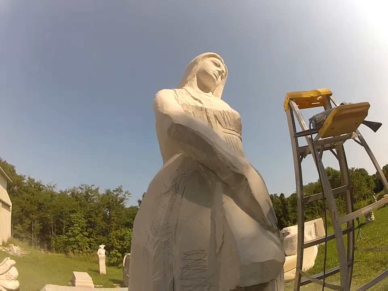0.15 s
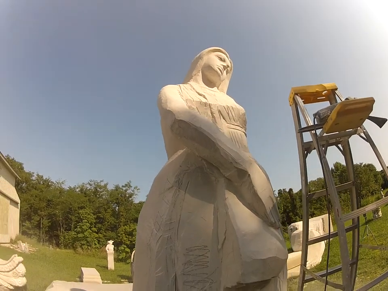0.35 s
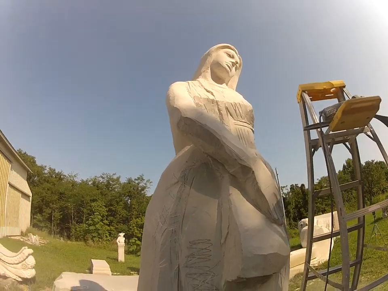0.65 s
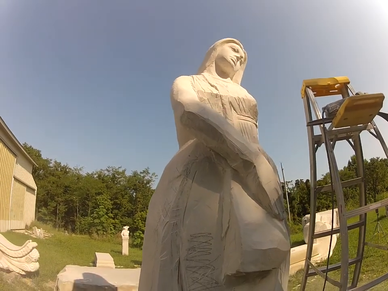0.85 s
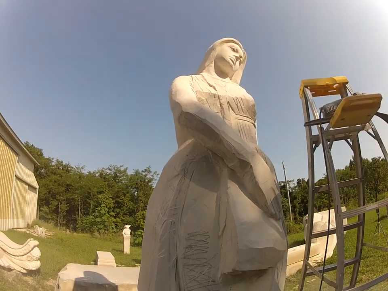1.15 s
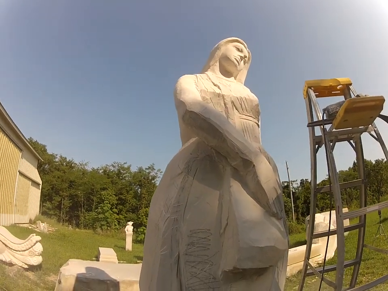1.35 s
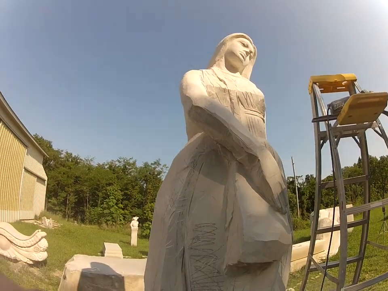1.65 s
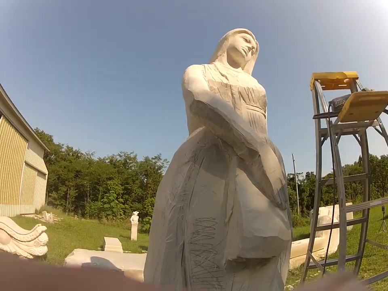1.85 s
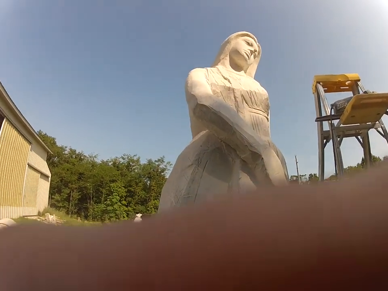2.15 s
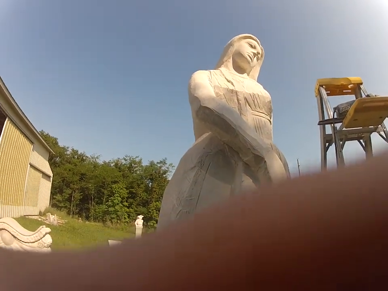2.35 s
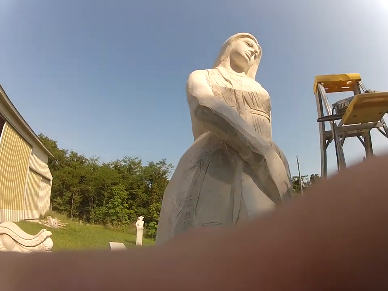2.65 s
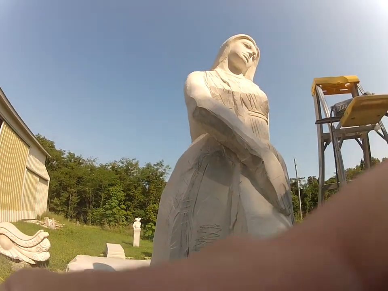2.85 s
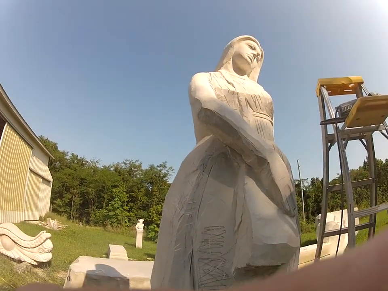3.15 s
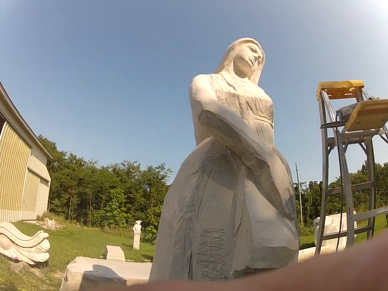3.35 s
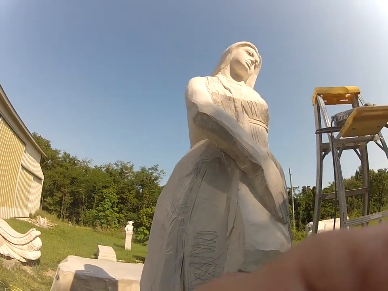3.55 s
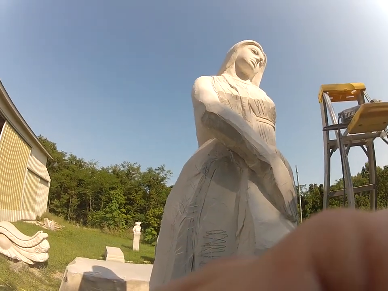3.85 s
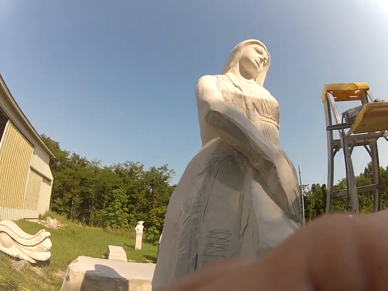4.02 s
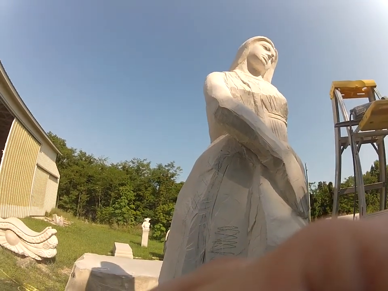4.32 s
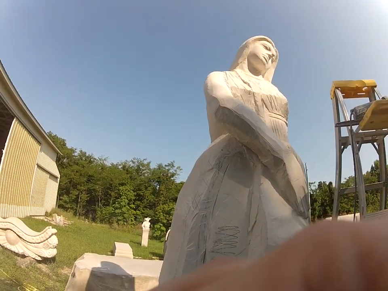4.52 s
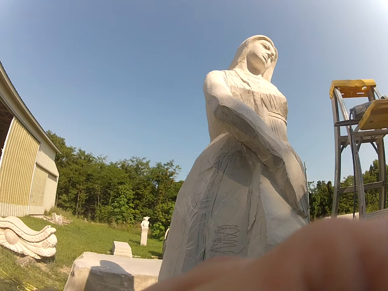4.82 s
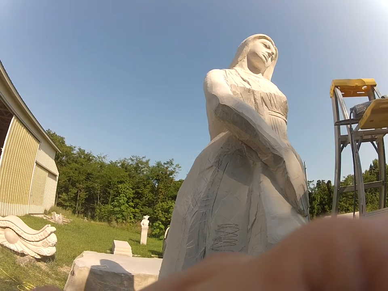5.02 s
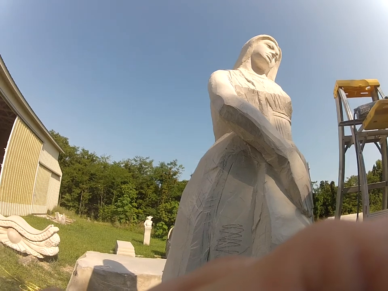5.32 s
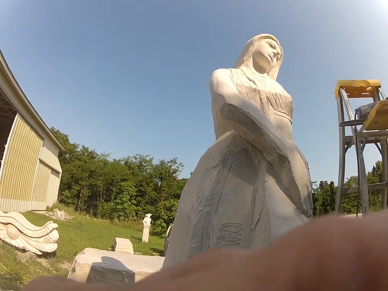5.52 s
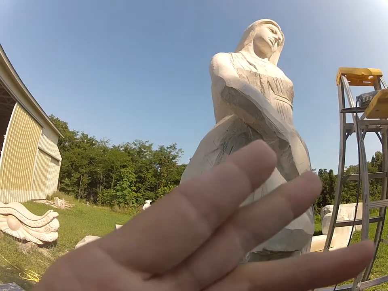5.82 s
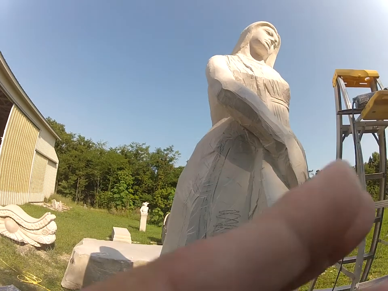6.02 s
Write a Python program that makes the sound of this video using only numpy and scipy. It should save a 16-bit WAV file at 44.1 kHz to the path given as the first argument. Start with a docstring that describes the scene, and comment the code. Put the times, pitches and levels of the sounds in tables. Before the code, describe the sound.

An angle grinder scours stone in a fast, rasping rattle over a low outdoor rumble, its motor whine falling in pitch twice. Much closer and louder, fingers rub and click on the microphone's plastic case and jolt its mount, and a fingertip pops against the opening midway and again near the end. The grinding gradually eases but keeps going, and everything has a thin, metallic edge in the treble.

```python
"""Outdoors, over low rumble, an angle grinder's disc bounces on stone; the motor slows, its whine sinks.
From 1 s a hand handles the camera: skin rubs the case, the case clicks, the mount thumps.
The whine stops at 2.6 s, returns high at 3 s and spins down again until 5.5 s.
At 3.6 s and 5.6 s a fingertip puffs air into the microphone port; the chatter runs on, softer.
Throughout, the camera holds its samples at a low rate, which mirrors every sound into the treble."""
import sys
import numpy as np
from scipy import signal
from scipy.fft import rfft, irfft, next_fast_len
from scipy.io import wavfile
from scipy.ndimage import map_coordinates

SR = 44100
rng = np.random.default_rng(int(sys.argv[2]) if len(sys.argv) > 2 else 0)


def wrap_up_sound(samples):
    """Save the sound to the file named by the first command line argument, as 16-bit audio."""
    columns = np.atleast_2d(samples).T
    # keep every value between -1 and 1, then stretch to whole-number steps
    tamed = np.clip(columns, -1, 1)
    steps = np.round(tamed * 32767).astype(np.int16)
    wavfile.write(sys.argv[1], SR, steps)


N = 272538
T = np.arange(N) / SR

# open-air rumble spectrum: freq_hz, relative_db
AIR_SPECTRUM = [(20, -29), (40, -4), (56, 1.5), (80, -12), (120, -20), (250, -22.5), (500, -31),
                (1000, -32.5), (5800, -49.5)]
# hand jolts the mount: time_s, level_db
MOUNT_JOLTS = [(1.045, -22.5), (1.078, -24), (1.755, -30.5), (1.879, -22), (2.34, -33), (2.58, -26.5),
               (2.927, -21), (3.032, -21), (3.468, -24.5), (3.599, -33), (4.16, -32.5), (5.564, -13),
               (5.623, -21.5)]
# fingertip on the microphone port: peak_s, level_db, rise_s, release_s
PORT_PUSHES = [(3.5828, -1, 0.00069, .002), (5.565, 1, 0.0013, 0.0013), (5.5792, -6.5, 0.00093, 0.0024),
               (5.6218, -14, 0.00057, 0.0024)]
# skin slides over the case: start_s, length_s, relative_db
RUB_STROKES = [(1.028, 0.067, -37.5), (1.196, 0.19, -36.5), (1.592, .077, -41), (1.735, 0.094, -43),
               (1.972, 0.14, -39.5), (2.102, 0.22, -47), (2.286, 0.25, -39.5), (2.517, .1, -30.5),
               (2.546, 0.042, -25), (2.625, 0.087, -40.5), (2.765, .042, -44), (2.868, 0.13, -39),
               (2.985, 0.17, -39), (3.141, 0.077, -38), (3.38, 0.13, -38.5), (3.706, 0.055, -42),
               (3.974, 0.069, -46), (5.528, 0.14, -42)]
# skin-on-plastic spectrum: freq_hz, relative_db
SKIN_SPECTRUM = [(60, 9.5), (200, 5), (400, -7), (750, -13), (1150, -1.5), (1500, -8.5), (1850, 1.5),
                 (2450, -0.5), (2800, -10), (3300, -1), (3700, 0), (4400, -14), (5200, -9), (5800, -14)]
# fingers click on the case: start_s, level_db, knock_relative_db, crack_relative_db, ring_t60_s
CASE_CLICKS = [(1.0335, -29.5, 2.5, -6, .02), (1.075, -26, -3, -1, 0.011), (1.3133, -11, -3, -14, 0.022),
               (1.322, -27, 5.5, -7, 0.018), (2.9407, -16.5, 11, -16, 0.021), (3.031, -26.5, 6, -18, 0.028),
               (3.2917, -21.5, 1, -19, .013), (3.4204, -32.5, 10, -8, .02), (3.5649, -33, -5, 9.5, 0.065),
               (3.582, -10.5, -8.5, 2.5, .016), (3.6087, -22.5, -27, -9, .02),
               (5.563, -16.5, -10, -4, 0.0095), (5.588, -27, -10, 5.5, 0.023), (5.5951, -18, 9, -9, 0.0086),
               (5.625, -23, -8, -31, 0.04)]
# plastic case modes: freq_hz, relative_db, t60_ratio
CASE_MODES = [(403, -1.5, 0.33), (662, -7, 0.45), (816, -8, 0.64), (1140, -4, 1.07), (1256, -13.5, 0.59),
              (1937, -8, 1.2), (2130, -11.5, 1.84), (2410, -3.5, 0.7), (3630, -9.5, 1), (4720, -28, 0.76)]
# the cut eases off: time_s, chatter_db, whirr_db, treble_tilt_db
CUT_LEVELS = [(0, -49, -51, 3), (.6, -48, -52.5, 0), (1.6, -49.5, -53, 0.5), (2.2, -52, -48, -2),
              (2.8, -49, -54, -0.5), (3.3, -49.5, -53.5, -3.5), (3.85, -52, -55, -1), (4.3, -52, -60, -3.5),
              (6.18, -54.5, -61.5, 1)]
# scouring spectrum: freq_hz, relative_db
WHIRR_SPECTRUM = [(100, -13), (400, -8.5), (800, -15.5), (1150, -2), (1300, -13), (1560, -31), (1850, -1.5),
                  (2100, 2), (2800, -8), (3600, -11), (3950, -17.5), (4850, -17), (5150, -20.5),
                  (5800, -27)]
# motor slows: start_s, length_s, pitch_hz, tau_s, drive_db, octave_relative_db, blur_hz
MOTOR_RUN_DOWNS = [(0, 2.6, 2465, 8.6, -1.5, -17.5, 114.6), (3.048, 2.5, 3296, 5.9, -5, -40, 3)]
# grinder housing resonances: freq_hz, width_hz, gain_db
HOUSING_MODES = [(2154, 300, -52.5), (2502, 69, -43), (2870, 66, -61), (3170, 150, -56)]
# disc bounces on the stone: time_s, rate_hz
BOUNCE_RATE = [(0, 27.8), (.27, 25.4), (.29, 35.7), (.93, 28.6), (.96, 35.4), (1.87, 33.9), (1.96, 30.4),
               (2.11, 26.4), (2.91, 23.8), (4.06, 26.1), (4.08, 17.5), (4.14, 25.1), (4.24, 20.3),
               (4.7, 19.3), (4.76, 25), (5.5, 22.5), (5.57, 17.3), (6.18, 23.8)]
# grit spray spectrum: freq_hz, relative_db
GRIT_SPECTRUM = [(100, -42), (400, -3), (800, -74), (1100, 5.5), (1550, -3), (1900, 8.5), (2400, 10.5),
                 (3000, -12.5), (3650, -9), (4200, -10), (5000, -15), (5800, -33)]
# disc and guard resonances: freq_hz, width_hz, relative_db
DISC_MODES = [(1070, 15, -9), (1148.5, 33, 5), (1390.4, 31.6, 4), (1930, 71, -2), (2022, 67, 7),
              (2246, 37, -0.5), (2494, 13, 10), (2860, 100, -0.5), (3210, 165, 0), (3552, 100, 3)]


def amp(db):
    """Decibels to gain."""
    return 10 ** (np.asarray(db) / 20)


def unit_rms(x):
    """Scale to rms 1."""
    return x / np.sqrt(np.mean(x ** 2) + 1e-20)


def curves(rows):
    """Per-sample curve for each column after time_s."""
    time_s, *columns = np.transpose(rows)
    return [np.interp(T, time_s, column) for column in columns]


def wobble(rate_hz):
    """Smooth random curve, rate_hz knots a second."""
    return map_coordinates(rng.standard_normal(int(N * rate_hz / SR) + 4), [T * rate_hz])


def filtered(x, response):
    """Apply response(hz) by FFT."""
    size = next_fast_len(N + SR // 2)
    return irfft(rfft(x, size) * response(np.fft.rfftfreq(size, 1 / SR)), size)[:N]


def colour(points):
    """Response joining freq_hz, gain_db points on a log axis."""
    freq_hz, gain_db = np.transpose(points)
    return lambda hz: amp(np.interp(np.log(hz + 1), np.log(freq_hz + 1), gain_db))


def resonance(modes, hz):
    """Summed band-pass response of the modes at hz."""
    return sum(amp(db) * 1j * hz * width_hz / (mode_hz ** 2 - hz ** 2 + 1j * hz * width_hz)
               for mode_hz, width_hz, db in modes)


def noise():
    """White noise."""
    return rng.standard_normal(N)


def add(track, start_s, sound):
    """Mix sound into track at start_s."""
    part = track[round(start_s * SR):][:len(sound)]
    part += sound[:len(part)]


def air_rumble(base_db=-57.5, swell_db=7, peak_s=3.3, width_s=2.3, gust_db=1.1):
    """Open air: one slow swell with small gusts."""
    swell = np.exp(-((T - peak_s) / width_s) ** 2)
    level_db = base_db + swell_db * swell - gust_db * wobble(6.7)
    return amp(level_db) * unit_rms(filtered(noise(), colour(AIR_SPECTRUM)))


def mount_thumps(sway_hz=56.9, t60_s=0.18, rise_s=0.0049):
    """Each jolt sets off the same damped sway of the mount."""
    track, t = np.zeros(N), np.arange(SR // 3) / SR
    sway = amp(-60 * t / t60_s) * (1 - np.exp(-t / rise_s)) * np.sin(2 * np.pi * sway_hz * t)
    for start_s, db in MOUNT_JOLTS:
        add(track, start_s, amp(db) * sway)
    return track


def port_puffs(leak_hz=45, roundness=1.98):
    """Each press on the port gives one pressure pulse that leaks away."""
    pressure = np.zeros(N)
    for peak_s, db, rise_s, release_s in PORT_PUSHES:
        width_s = np.where(T < peak_s, rise_s, release_s)
        pressure += amp(db) * np.exp(-np.abs((T - peak_s) / width_s) ** roundness)
    return filtered(pressure, lambda hz: 1j * hz / (leak_hz + 1j * hz))


def skin_rubs(grain_db=3, taper=0.53, drag_relative_db=-41, press_relative_db=-18.5, press_s=0.04):
    """Sliding skin catches in tiny grains; the press that jolts the mount adds bass."""
    rasp, sliding = np.zeros(N), np.zeros(N)
    for start_s, length_s, db in RUB_STROKES:
        stroke = signal.windows.tukey(round(length_s * SR), taper)
        add(rasp, start_s, amp(db) * stroke)
        add(sliding, start_s, stroke)
    press = sum(amp(db + press_relative_db) * np.exp(-((T - time_s) / press_s) ** 2)
                for time_s, db in MOUNT_JOLTS)
    drag = np.minimum(sliding, 1) * (amp(drag_relative_db) + press)
    grains = unit_rms(filtered(noise() * amp(grain_db * wobble(700)), colour(SKIN_SPECTRUM)))
    bass = filtered(grains, lambda hz: 1 / (1 + (hz / 1000) ** 4))
    return rasp * (grains - bass) + drag * bass


def case_clicks(knock_hz=240, knock_t60_s=0.011, crack_t60_s=0.013, rise_s=0.00032, low_cut_hz=130):
    """A crack, a short ring of the plastic and a hollow knock from the air inside."""
    track, t = np.zeros(N), np.arange(SR // 10) / SR
    for start_s, db, knock_db, crack_db, t60_s in CASE_CLICKS:
        ring = np.zeros(len(t))
        for hz, mode_db, t60_ratio in CASE_MODES:
            decay = amp(mode_db + 2 * rng.standard_normal() - 60 * t / (t60_s * t60_ratio))
            ring += decay * np.sin(2 * np.pi * hz * rng.normal(1, 0.036) * t)
        knock = amp(knock_db - 60 * t / knock_t60_s) * np.sin(2 * np.pi * knock_hz * t)
        crack = amp(crack_db - 60 * t / crack_t60_s) * rng.standard_normal(len(t))
        add(track, start_s, amp(db) * (1 - np.exp(-t / rise_s)) * (ring + knock + crack))
    low_cut = signal.butter(2, low_cut_hz, 'highpass', fs=SR, output='sos')  # small case, no deep bass
    return signal.sosfilt(low_cut, track)


def disc_whirr(flutter_db=2, grain_db=2):
    """The disc keeps scouring the stone between bites."""
    _, whirr_db, _ = curves(CUT_LEVELS)
    envelope = amp(whirr_db + flutter_db * wobble(60))
    grains = noise() * amp(grain_db * wobble(400))
    return envelope * unit_rms(filtered(grains, colour(WHIRR_SPECTRUM)))


def motor_whine(fade_s=0.035, waver_db=1):
    """Tone and faint octave sink with shaft speed, swelling at each housing resonance."""
    track = np.zeros(N)
    for start_s, length_s, start_hz, tau_s, drive_db, octave_db, blur_hz in MOTOR_RUN_DOWNS:
        pitch_hz = start_hz * np.exp(-(T - start_s) / tau_s)
        phase = 2 * np.pi * np.cumsum(pitch_hz + blur_hz * wobble(600)) / SR
        gate = np.clip(np.minimum(T - start_s, start_s + length_s - T) / fade_s, 0, 1)
        tone = np.sqrt(2) * (np.sin(phase) + amp(octave_db) * np.sin(2 * phase))
        housing_gain = np.abs(resonance(HOUSING_MODES, pitch_hz))
        track += gate * housing_gain * amp(drive_db + waver_db * wobble(30)) * tone
    return track


def disc_chatter(rise_s=0.0028, bite_s=0.012, scatter_db=0.44, grain_db=3, ring_db=3, ring_top_hz=3700,
                 squeal_db=-2, high_hz=3550, low_hz=1800, sag_s=0.008, blur_hz=240):
    """Each bounce bites the stone: grit sprays, disc and guard ring, the bite drags a squeal down."""
    chatter_db, _, tilt_db = curves(CUT_LEVELS)
    rate_hz, = curves(BOUNCE_RATE)
    age_s = np.cumsum(rate_hz) / SR % 1 / rate_hz  # since the last bounce
    force = amp(scatter_db * wobble(25) + grain_db * wobble(450))
    contact = unit_rms(force * (1 - np.exp(-age_s / rise_s)) * np.exp(-(age_s / bite_s) ** 2))
    spray = unit_rms(filtered(contact * noise(), colour(GRIT_SPECTRUM)))
    ring = unit_rms(filtered(contact * noise(),
                             lambda hz: resonance(DISC_MODES, hz) / (1 + (hz / ring_top_hz) ** 10)))
    squeal_hz = low_hz + (high_hz - low_hz) * np.exp(-age_s / sag_s) + blur_hz * wobble(900)
    squeal = unit_rms(contact * np.sin(2 * np.pi * np.cumsum(squeal_hz) / SR))
    bites = unit_rms(spray + amp(ring_db) * ring + amp(squeal_db) * squeal)
    lows = filtered(bites, lambda hz: 1 / (1 + (hz / 2200) ** 4))
    return amp(chatter_db) * (amp(-tilt_db) * lows + amp(tilt_db) * (bites - lows))


def scene():
    """Grinder, hand and open air, mono."""
    grinder = disc_chatter() + disc_whirr() + motor_whine()
    hand = amp(-2) * skin_rubs() + case_clicks() + mount_thumps() + port_puffs()
    return (grinder + hand + air_rumble())[None]


def record(dry):
    """Sample and hold: the narrow band is mirrored around the hold rate and droops toward it."""
    hold_hz, band_hz, top_hz = 12000, 5850, 15400
    narrow = filtered(dry[0], lambda hz: 1 / np.sqrt(1 + (hz / band_hz) ** 120))
    mirrored = narrow * (1 + 2 * np.cos(2 * np.pi * hold_hz * T))
    return filtered(mirrored, lambda hz: np.sinc(hz / hold_hz) * (hz < top_hz))[None]


dry = scene()
out = record(dry)
wrap_up_sound(out)
```